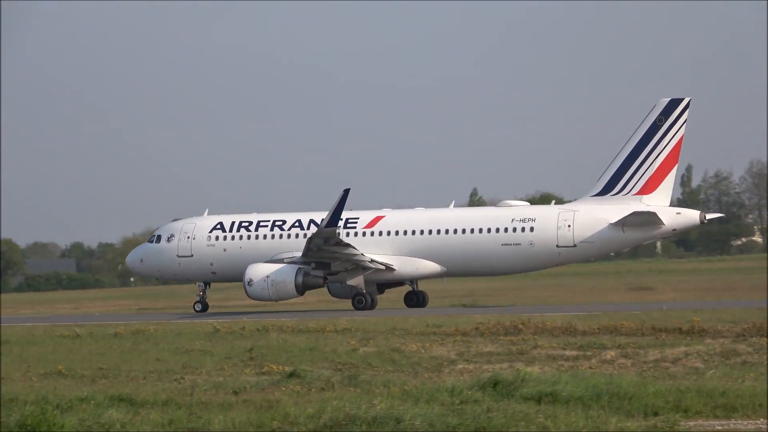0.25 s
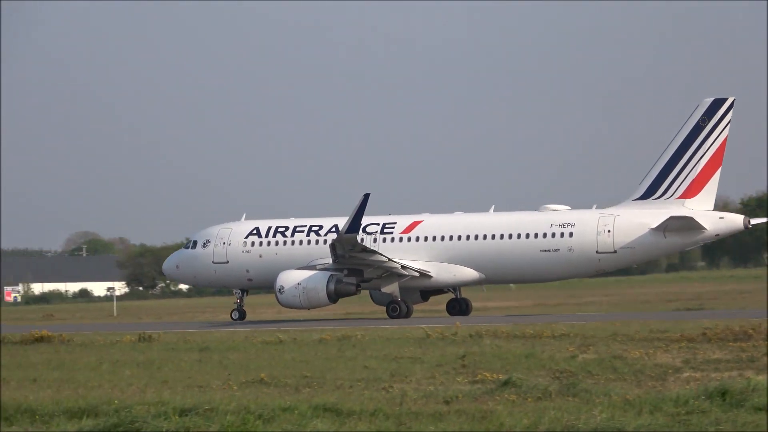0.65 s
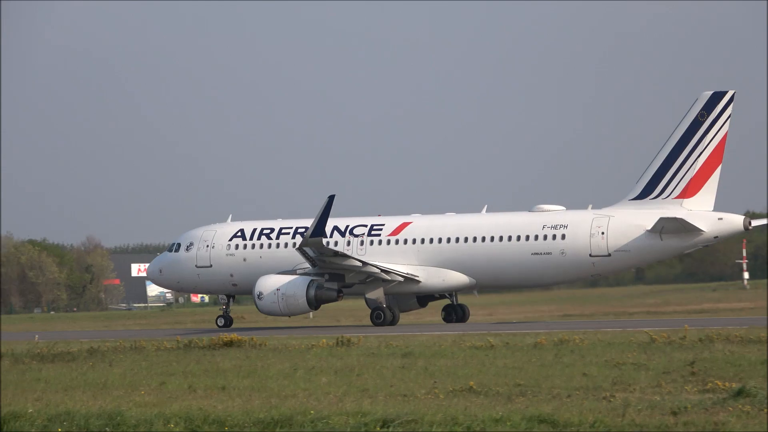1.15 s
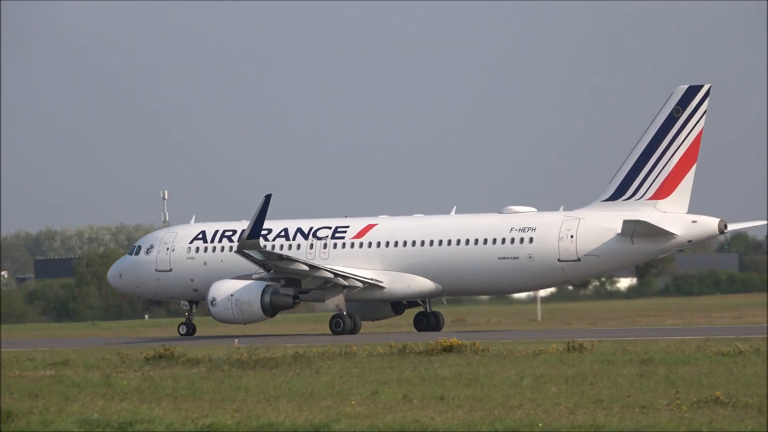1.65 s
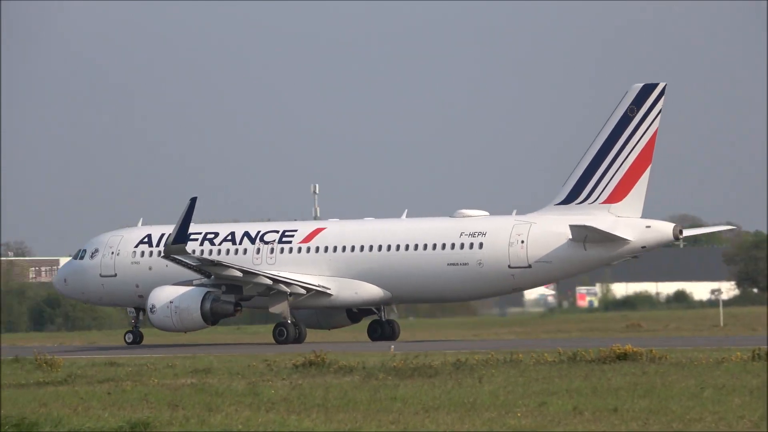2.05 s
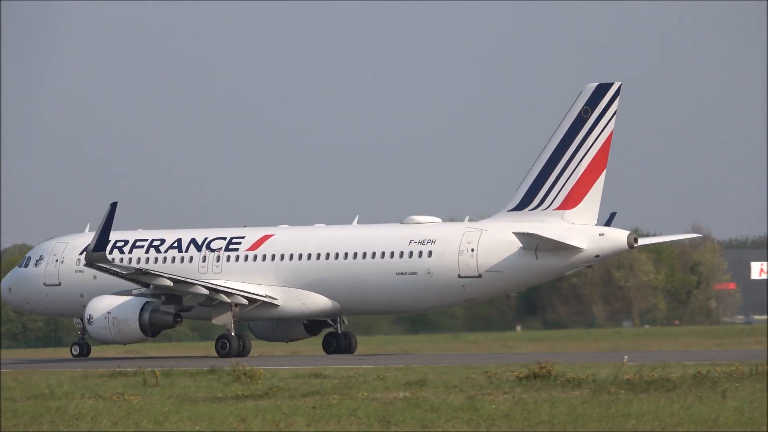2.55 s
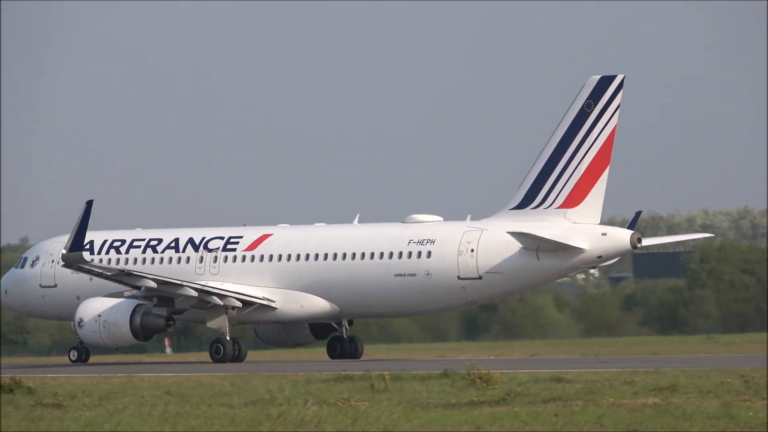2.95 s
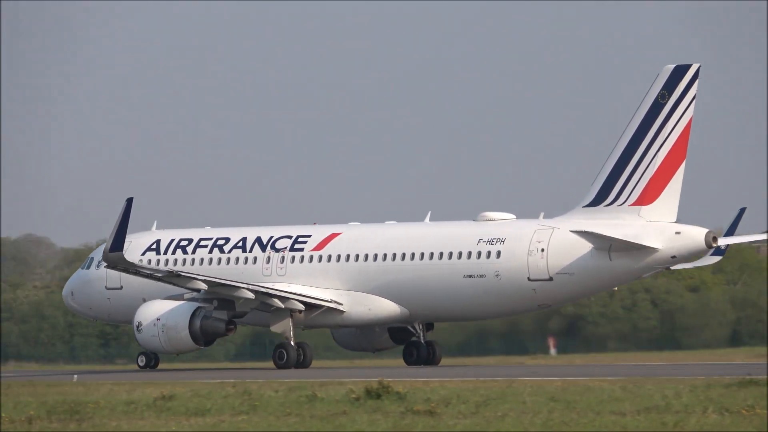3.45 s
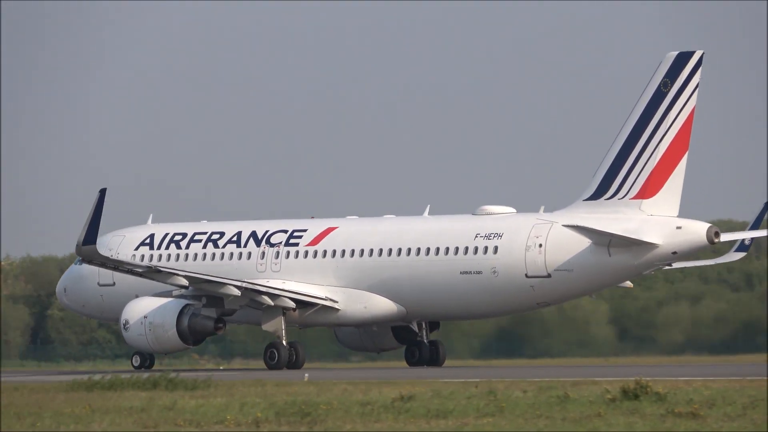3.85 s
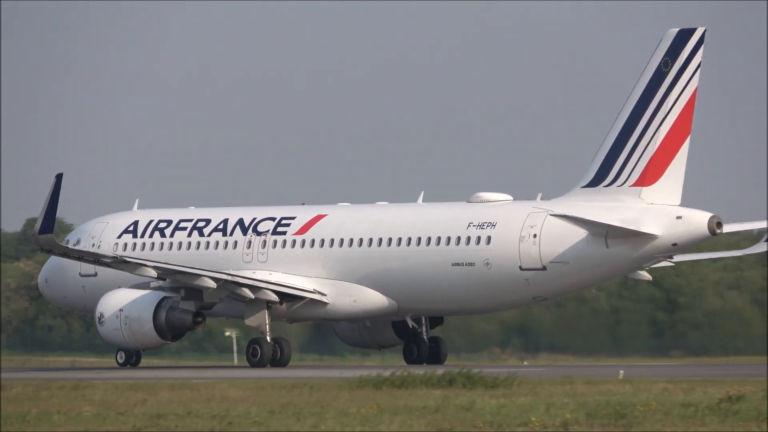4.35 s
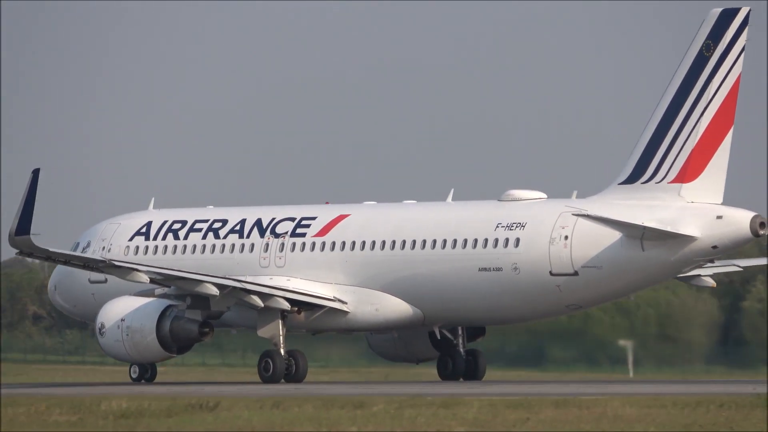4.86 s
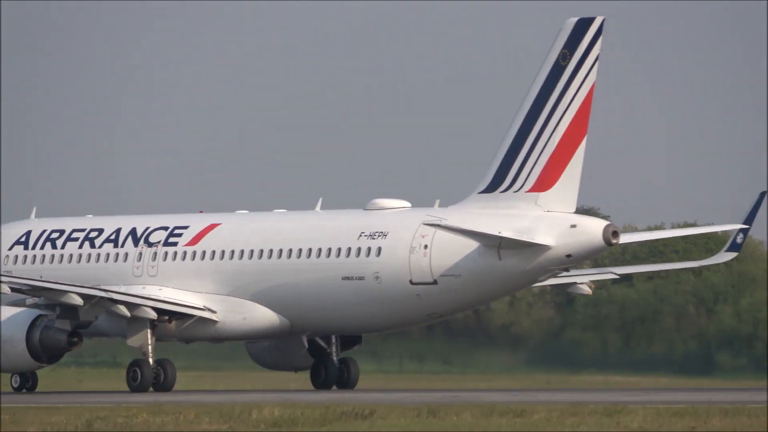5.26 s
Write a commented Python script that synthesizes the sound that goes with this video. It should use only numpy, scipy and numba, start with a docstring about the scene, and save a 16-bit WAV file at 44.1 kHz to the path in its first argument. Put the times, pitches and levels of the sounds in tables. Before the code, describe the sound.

Wind rumble in the foreground, deep and uneven, with blunt buffets and fluttering gusts. Behind it, across open grass, jet engines roar with a blurred high fan whine that sinks very slightly. The sound starts bright, then loses its top as the plane draws past. Near the end a rasping noise sweeps up and drops back; the stretch ends still roaring and windy.

```python
"""A twin-engined airliner draws past on a runway, heard across grass by a microphone in gusty wind.
It opens on roaring jets (shaped noise), whining fans (blurred tones, sinking in pitch) and low wind rumble
(swept noise humps). A gust lifts the rumble's level and centre at 0.6 s; the hiss dulls from 1.6 s and
the fan overtones from 2.3 s. Gusts return from 2.9 s, and a rasping noise band climbs and falls back
between 4.8 and 5.4 s. Throughout, a limiter ducks everything under the loudest peaks."""
import sys
import numpy as np
from scipy import signal
from scipy.fft import rfft, irfft
from scipy.io import wavfile
from scipy.ndimage import uniform_filter1d
from numba import njit

SR = 44100
rng = np.random.default_rng(int(sys.argv[2]) if len(sys.argv) > 2 else 0)


def digitize_waveform(pressure):
    """Quantize a signal to 16-bit integers and store it at the path in sys.argv[1].

    Rows of a 2-D input are taken as channels; values are limited to [-1, 1].
    """
    field = np.atleast_2d(pressure).T
    bounded = np.clip(field, -1, 1)
    quanta = np.round(bounded * 32767).astype(np.int16)
    wavfile.write(sys.argv[1], SR, quanta)


N = 242991  # length in samples

# Jet loudness as heard, before the limiter: (time [s], level [dB])
JET_LEVEL = [(0, -26.5), (.56, -28.5), (.6, -30.5), (.72, -39.5), (.78, -37.5), (.9, -36), (.96, -30.5),
             (1.07, -29.5), (1.12, -28.5), (1.16, -26.5), (1.22, -29), (1.8, -29.5), (2.2, -33.5),
             (2.7, -30.5), (2.92, -32), (3.0, -36), (3.15, -34), (3.3, -31.5), (3.36, -33.5), (3.43, -29),
             (3.47, -34.5), (3.7, -33), (3.85, -33.5), (3.91, -29), (3.97, -32.5), (4.6, -33), (4.8, -34.5),
             (5.1, -29.5), (5.32, -36.5), (5.345, -43), (5.375, -32), (5.51, -33.5)]


def engines():
    """Jet roar, hiss and fan whine scintillate together in the shared air; the surge is laid over them."""
    air_db = 0.87 * walk(24.73)
    jets = jet_roar(air_db) + jet_hiss(air_db) + fans(air_db)
    level_db, = curve(JET_LEVEL)
    return jets * undb(level_db) + surge()


# Tone colour of the roar, relative: (frequency [Hz], density [dB per Hz])
ROAR_SPECTRUM = [(150, 4.5), (500, 6.5), (1200, -0.5), (2000, -1.5), (3000, -2.5), (4200, -8),
                 (5200, -11.5), (6500, -18)]


def jet_roar(air_db):
    """Broad low and middle noise of the turbulent jets."""
    return turbulent(ROAR_SPECTRUM, air_db, 0.33)


HISS_DB = -11  # against the roar
HISS_FADE_S, HISS_DB_PER_S = 1.61, -3.5  # the top dulls once the intakes turn away
# Tone colour of the hiss, relative: (frequency [Hz], density [dB per Hz])
HISS_SPECTRUM = [(4000, -6.5), (5000, -3), (5800, -2.5), (6500, -3), (7200, 2.5), (8000, -11), (9000, -18),
                 (10500, -17), (11500, -28.5), (14000, -43.5)]


def jet_hiss(air_db):
    """High turbulent noise over the roar, fading steadily after its turning point."""
    since_fade = np.maximum(seconds() - HISS_FADE_S, 0)
    return undb(HISS_DB + HISS_DB_PER_S * since_fade) * turbulent(HISS_SPECTRUM, air_db, 1.0)


FAN_HZ, FAN_HZ_PER_S = 2440, -27  # blade-passing pitch, sinking as the aircraft draws past
ENGINE_SPLIT = 0.0044  # speed difference of the two fans, share
FAR_FAN_DB = -11  # the fuselage shades the far engine
WHINE_DB = -19  # against the roar
OVERTONE_DB, OVERTONE_FADE_S, OVERTONE_DB_PER_S = 3.5, 2.33, -2.5  # overtones against the tone, then fading
WAVERS_PER_S = 90
SWELL_EDGE_S = .02
# Partials of the whine: (multiple of the blade pitch, level [dB], blur [Hz],
# steady part [ratio to the scattered part], pitch waver at the start [share], at the end [share])
WHINE_PARTIALS = [(1, -2, 42, 2.8, .009, .003), (2, -3, 80, .5, .003, .004), (3, -4, 120, .3, .003, .008)]
# The blade tone alone swells or sinks: (time [s], level change [dB], length [s])
BLADE_SWELLS = [(0, 3, .07), (.18, 2, .3), (.5, -4, .1), (.68, -5, .12), (.82, 3, .1), (1.01, 3, .08),
                (1.14, 3, .08), (1.27, -4, .07), (1.36, 2, .06), (1.52, 3, .06), (1.75, -5, .05),
                (1.81, 3, .06), (1.93, -3, .06), (2.1, -4, .14), (2.3, -3, .1), (2.72, 3, .05),
                (2.86, 2, .1), (3.02, -3, .14), (3.21, 2, .07), (3.28, 6, .16), (3.49, -3, .08),
                (3.79, 7, .13), (3.93, -4, .1), (4.22, 3, .09), (4.4, 3, .05), (4.52, -6, .11),
                (4.85, 6, .32), (5.18, -8, .4)]


def fans(air_db):
    """Blade tones of two fans, smeared into narrow grainy bands by the turbulent air on the way."""
    out, t = 0, seconds()
    blade_hz = FAN_HZ + FAN_HZ_PER_S * t
    swell_db = bumps(BLADE_SWELLS, SWELL_EDGE_S)
    overtone_db = OVERTONE_DB + OVERTONE_DB_PER_S * np.maximum(t - OVERTONE_FADE_S, 0)
    for multiple, db, blur_hz, steady, *waver in WHINE_PARTIALS:
        for side, shade_db in ((-.5, 0.022), (.5, FAR_FAN_DB)):  # near fan, far fan
            pitch_ratio = 1 + side * ENGINE_SPLIT + np.linspace(*waver, N) * walk(WAVERS_PER_S)
            turns = np.cumsum(multiple * blade_hz * pitch_ratio) / SR
            # random size and phase widen the pure tone into a band
            scatter = walk(2 * blur_hz) + 1j * walk(2 * blur_hz) + steady
            tone = (scatter * np.exp(2j * np.pi * turns)).real
            out = out + undb(db + shade_db + (overtone_db if multiple > 1 else swell_db)) * tone
    return out * undb(WHINE_DB + air_db)


SURGE_WIDTH, SURGE_TOP = 2.4, 1.42  # width and top edge, in units of the centre
# Rasp climbing through the roar and falling back: (time [s], level [dB], centre [Hz])
SURGE_SWEEP = [(4.78, -68, 1300), (4.84, -37.5, 1300), (4.93, -33, 1465), (5.0, -33, 1610),
               (5.06, -34, 1640), (5.12, -28, 1730), (5.15, -36, 2210), (5.18, -31.5, 2980),
               (5.205, -30.5, 3250), (5.24, -29, 2700), (5.28, -34, 2230), (5.33, -36.5, 2100),
               (5.38, -64.5, 2130)]


def surge():
    """A wide band of rough noise, steep above, sweeping with its centre."""
    db, hz = curve(SURGE_SWEEP)
    band = rng.standard_normal(N)
    for _ in range(2):
        band = svf(band, hz, SURGE_WIDTH)[0]
    for _ in range(2):
        band = svf(band, hz * SURGE_TOP, 1.1)[1]
    return unit(band / np.sqrt(hz)) * undb(db + 1.0 * walk(70))


CALM_HZ = 96  # centre of the rumble in light wind
BUFFET_EDGE_S = 0.0018
# Wind on the microphone, before the limiter: (time [s], level [dB], nominal centre [Hz])
WIND_RUMBLE = [(0, -16, 107.5), (.52, -15, 123), (.6, -10, 176), (.69, -11, 210), (.76, -12.5, 234),
               (.88, -11, 298), (.98, -18.5, 265), (1.05, -16, 270), (1.16, -13.5, 162), (1.3, -12.5, 199),
               (1.38, -15, 133), (1.55, -16.5, 115), (2.2, -15, 98), (2.6, -15, 107.4), (2.93, -12, 110),
               (2.99, -14.5, 226), (3.1, -7, 262), (3.34, -16, 312), (3.385, -22.5, 239), (3.44, -10, 232),
               (3.5, -13.5, 341), (3.7, -10.5, 308), (3.96, -16.5, 325), (4.0, -22.5, 298),
               (4.03, -21, 299), (4.28, -16, 297), (4.38, -18, 331), (4.8, -15.5, 317), (4.87, -29, 310),
               (4.92, -18.5, 308), (5.02, -24.5, 199), (5.08, -16, 197), (5.17, -15, 245), (5.27, -14, 175),
               (5.38, -11, 223), (5.51, -19, 194)]
# Short buffets and one brief lull of the wind: (time [s], level change [dB], length [s])
WIND_BUFFETS = [(.16, 6.5, 0.038), (.4, 8, 0.018), (.455, 5.5, 0.033), (.73, 1.5, 0.021), (1.52, 9, 0.0055),
                (2.71, 6.5, 0.019), (2.955, 2.5, 0.051), (3.235, 10.5, 0.011), (4.155, 2, 0.044),
                (5.33, -1.5, 0.047)]


def wind():
    """Eddies at the microphone: main hump, humming core, flutter above and throb below, uneven in level."""
    db, hz = curve(WIND_RUMBLE)
    octaves = np.log2(hz / CALM_HZ)
    rumble = 0.72 * eddies(hz, 0.93) + rumble_core(hz, octaves)
    rumble = rumble + wind_flutter(hz, octaves) + wind_throb(hz)
    return rumble * undb(db + bumps(WIND_BUFFETS, BUFFET_EDGE_S) + 0.082 * walk(22.51))


CORE_DB, CORE_FADE_DB = -2, -8  # the fade goes with the square of the octaves risen


def rumble_core(hz, octaves):
    """Narrow hum inside the rumble, strongest in light wind."""
    return eddies(hz * 1.114, 0.36) * undb(CORE_DB + CORE_FADE_DB * octaves ** 2)


FLUTTER_DB, FLUTTER_DB_PER_OCTAVE = -12.5, 5.5  # against the rumble; grows as the centre rises
# Short spurts and lulls of flutter: (time [s], level change [dB], length [s])
FLUTTER_SPURTS = [(.695, 4.5, 0.015), (.822, 1, 0.02), (.915, -0.5, 0.034), (.98, -1.5, .05),
                  (1.045, 8.5, 0.035), (1.26, -1.5, 0.069), (2.966, 6.5, 0.039), (3.154, 6, 0.016),
                  (3.27, -1, 0.088), (3.47, 0, 0.054), (4.02, 4.5, 0.063), (4.26, -6.5, 0.052),
                  (4.402, 6, 0.027), (4.613, 4, 0.021), (4.652, 9, 0.018), (4.742, 4, 0.018),
                  (4.787, -1.5, 0.015), (4.905, 8.5, 0.01)]


def wind_flutter(hz, octaves):
    """Noise hump above the rumble, louder and more restless as the rumble's centre rises."""
    db = FLUTTER_DB + FLUTTER_DB_PER_OCTAVE * octaves
    restless_db = (1.5 + 0.77 * octaves) * walk(60)
    return eddies(170 + 0.67 * hz, 0.9) * undb(db + restless_db + bumps(FLUTTER_SPURTS, BUFFET_EDGE_S))


# Low throb, thinning in the gusts: (time [s], level against the rumble [dB])
THROB_LEVEL = [(0, -4.5), (.6, -7), (.72, -8), (.85, -24), (.93, -18), (1.0, -17.5), (1.08, -9.5),
               (1.2, -12), (1.5, -9), (2.9, -5), (3.05, -8), (3.15, -19.5), (3.3, -25), (3.45, -21.5),
               (3.55, -41), (4.0, -26), (4.8, -28.5), (4.95, -26), (5.1, -10), (5.51, -15)]


def wind_throb(hz):
    """Slow noise hump under the rumble, uneven in level."""
    return eddies(58 + 0.21 * hz, 0.72) * undb(curve(THROB_LEVEL)[0] + 2.95 * walk(17))


def eddies(hz, damping):
    """A hump of noise, steep on both sides; a wider band passes more noise, so it is scaled back."""
    hump = svf(rng.standard_normal(N), hz * 0.93, damping)[0]
    hump = svf(hump, hz * 0.92, damping)[0]
    band, low = svf(hump, hz * 0.28, 1.39)
    upper = hump - band - low  # what is left is the high-pass
    return unit(svf(upper, hz * 1.94, 2.04)[1] / np.sqrt(hz))


def turbulent(points, air_db, flicker_db):
    """Half-octave noise bands after a spectrum; all ride the same air, each flickers alone."""
    hz, db = np.transpose(points)
    f, out = np.maximum(np.fft.rfftfreq(N, 1 / SR), 1), 0
    spectrum = rfft(rng.standard_normal(N)) * undb(np.interp(np.log(f), np.log(hz), db))
    for octave in np.arange(np.log2(hz[0]), np.log2(hz[-1]) + .5, .5):
        share = np.clip(1 - 2 * abs(np.log2(f) - octave), 0, 1)
        out = out + irfft(spectrum * share, N) * undb(flicker_db * walk(11))
    return unit(out * undb(air_db))


def undb(db):
    """Gain of a level in dB."""
    return 10 ** (np.asarray(db) / 20)


def unit(x):
    """Scaled to rms 1."""
    return x / np.sqrt(np.mean(x ** 2))


def seconds():
    """Time of every sample."""
    return np.arange(N) / SR


def curve(table):
    """Columns of a table of time, read at every sample."""
    s, *columns = np.transpose(table)
    return [np.interp(seconds(), s, c) for c in columns]


def bumps(table, edge_s):
    """Changes in dB held for their length, with softened edges."""
    t = seconds()
    steps = sum(db * ((t >= s) & (t < s + length)) for s, db, length in table)
    return uniform_filter1d(steps, max(int(edge_s * SR), 1))


def walk(rate):
    """Random levels held 1 / rate s and slewed twice; spread near 1."""
    k = int(SR / rate)
    held = np.repeat(rng.standard_normal(N // k + 1), k)
    return 1.3 * uniform_filter1d(uniform_filter1d(held, k), k)[:N]


@njit
def svf(x, hz, damping):
    """State-variable filter with a moving centre: band-pass and low-pass."""
    y, b, l = np.empty((2, len(x))), 0., 0.
    for i in range(len(x)):
        g = np.tan(np.pi * hz[i] / SR)
        v = (b + g * (x[i] - l)) / (1 + g * (g + damping))
        y[0, i], y[1, i] = damping * v, l + g * v
        b, l = 2 * v - b, l + 2 * g * v
    return y


@njit
def limiter(x, top, attack, release):
    """Gain that holds the followed peak level under top."""
    gain, e = np.empty(len(x)), 0.
    for i in range(len(x)):
        e += (abs(x[i]) - e) * (attack if abs(x[i]) > e else release)
        gain[i] = min(1., top / (e + 1e-9))
    return gain


# Left or right lean, band by band: (centre [Hz], width [Hz], share of the middle added left, taken right)
STEREO_LEAN = [(45, 25, -.1), (85, 35, -.3), (185, 25, -.28), (335, 60, -.58), (415, 25, .5),
               (470, 22, -.5), (525, 25, .25), (590, 30, .08), (695, 25, .55), (765, 35, -.5),
               (860, 30, .2), (1020, 80, .4), (1220, 270, .85), (1850, 250, .3), (2400, 330, .48),
               (2900, 130, .3), (3300, 170, .3), (4200, 550, .47), (6000, 750, .48)]
# Quarter-cycle part of the lean: (centre [Hz], width [Hz], share added early, or late if negative)
STEREO_LAG = [(5100, 500, -0), (6100, 900, -0.65)]
# Unrelated sound between the channels: (frequency [Hz], level against the middle [dB])
STEREO_LOOSE = [(40, -18), (150, -24.5), (300, -14.5), (600, -18), (1000, -14), (1500, -18), (2200, -19),
                (4000, -16), (6000, -15.5), (7500, -26.5), (12000, -25)]
# the lean of the bass shrinks to this share late on
BASS_HZ, BASS_CENTRES_S, BASS_TURN_S, BASS_LEAN_LEFT = 372, 5.03, .03, 0.43


def stereo_side(mid):
    """Half the channel difference: leaning bands plus a phase-scrambled copy of the middle."""
    size = 2 * N  # the sound and its mirror image, so that the ends join smoothly
    f, spectrum = np.fft.rfftfreq(size, 1 / SR), rfft(np.r_[mid, mid[::-1]])

    def bells(table):
        """Sum of bell-shaped bands over frequency."""
        return sum(a * np.exp(-((f - hz) / w) ** 2) for hz, w, a in table)

    lean = bells(STEREO_LEAN).clip(-.82, .82) + 1j * bells(STEREO_LAG)
    # scrambling the phase slowly over frequency smears a copy into an unrelated one
    phase = np.cumsum(rng.standard_normal(len(f))) / 5
    scramble = np.exp(1j * phase) * undb(np.interp(f, *np.transpose(STEREO_LOOSE)))
    turned = (1 + np.tanh((seconds() - BASS_CENTRES_S) / BASS_TURN_S)) / 2
    bass = irfft(spectrum * lean * (f < BASS_HZ), size)[:N] * (1 - (1 - BASS_LEAN_LEFT) * turned)
    return bass + irfft(spectrum * (lean * (f >= BASS_HZ) + scramble), size)[:N]


def scene():
    """Engines and wind reach both channels alike."""
    return np.tile(engines() + wind(), (2, 1))


def record(dry):
    """Bass cut, limiter, band-wise stereo spread, steep top."""
    bass_cut = signal.butter(3, 48, "high", fs=SR, output="sos")
    mid = signal.sosfilt(bass_cut, dry.mean(axis=0))
    gain = limiter(mid, 0.28, 1 / (0.0012 * SR), 1 / (0.01 * SR))  # attack 1.2 ms, release 10 ms
    mid = np.r_[np.zeros(40), mid[:-40]] * gain  # sound held back 40 samples, so the gain looks ahead
    side = stereo_side(mid)
    steep_top = signal.ellip(8, .2, 70, 15700, fs=SR, output="sos")
    return signal.sosfilt(steep_top, [mid + side, mid - side])


dry = scene()
out = record(dry)
digitize_waveform(out)
```